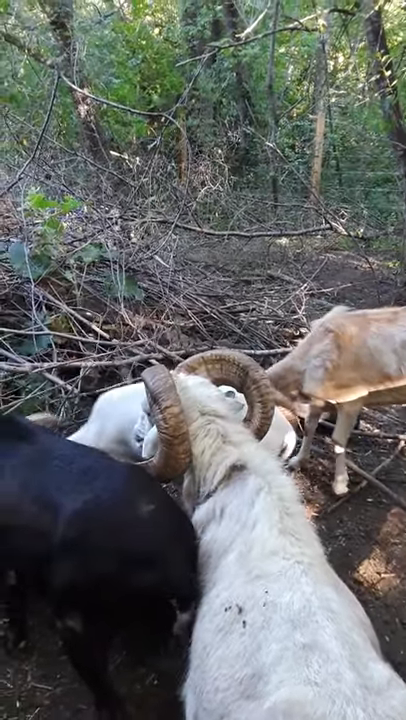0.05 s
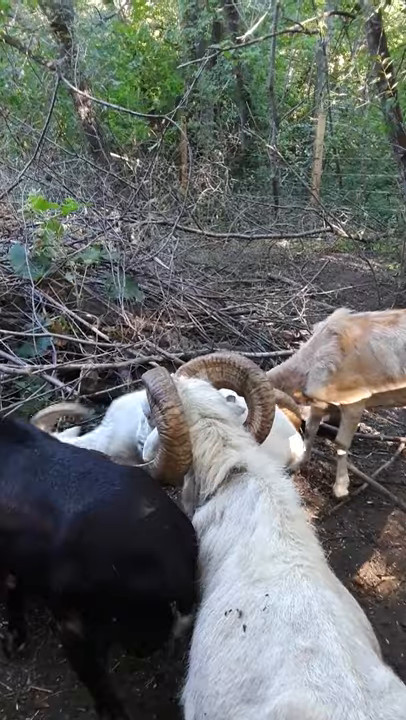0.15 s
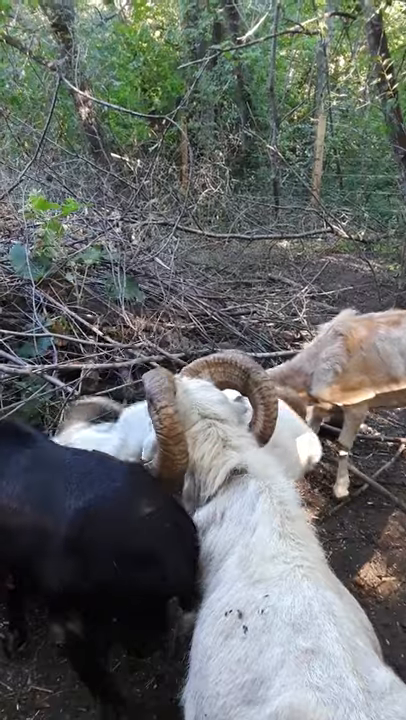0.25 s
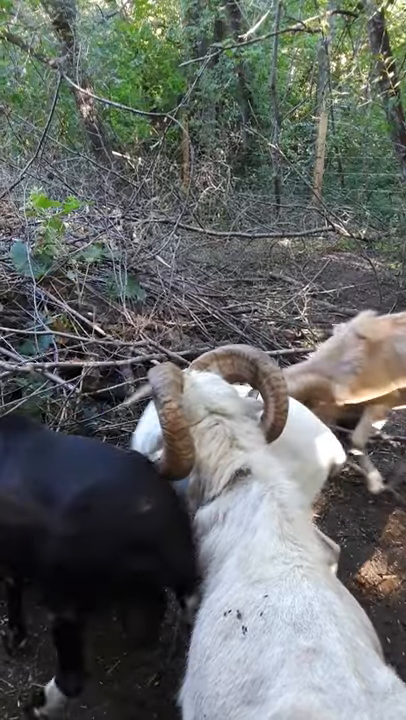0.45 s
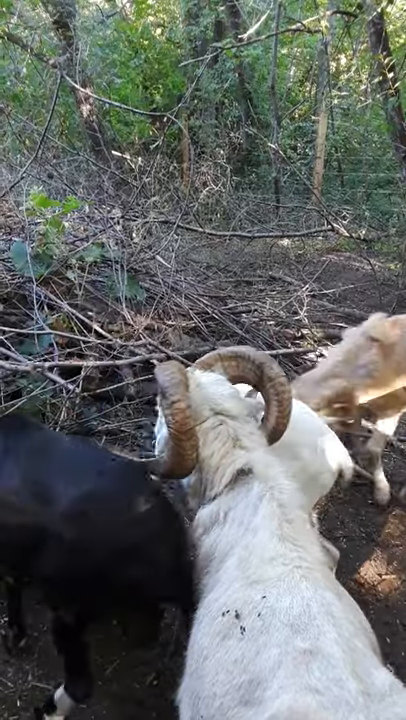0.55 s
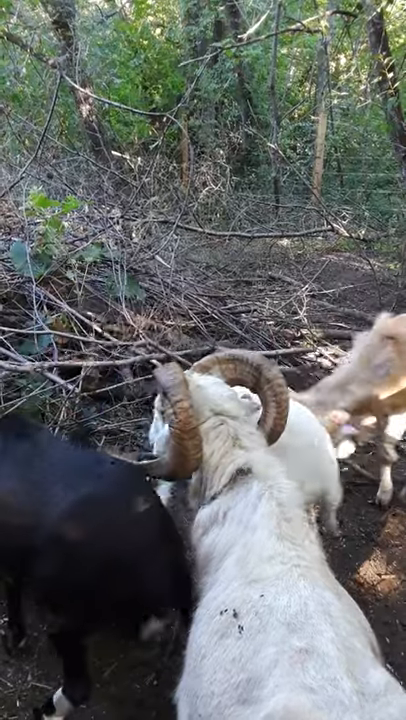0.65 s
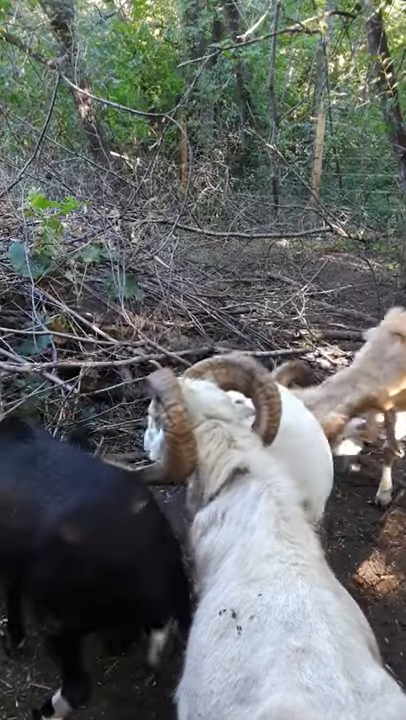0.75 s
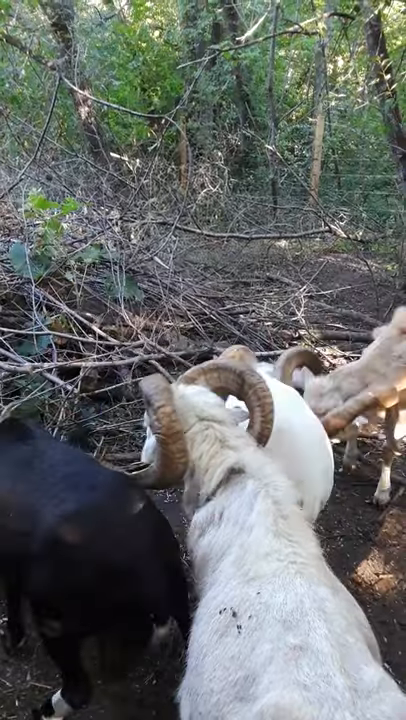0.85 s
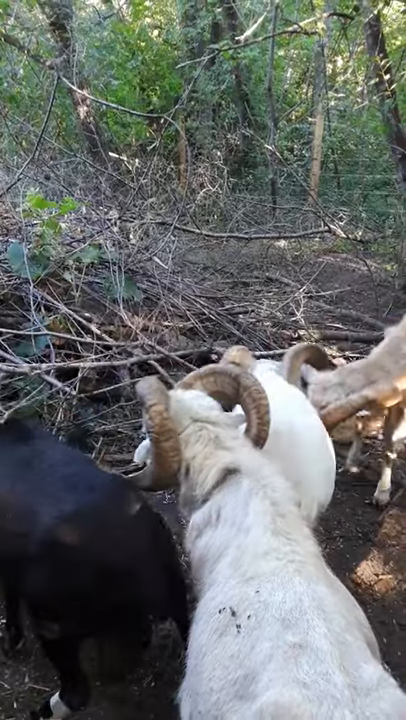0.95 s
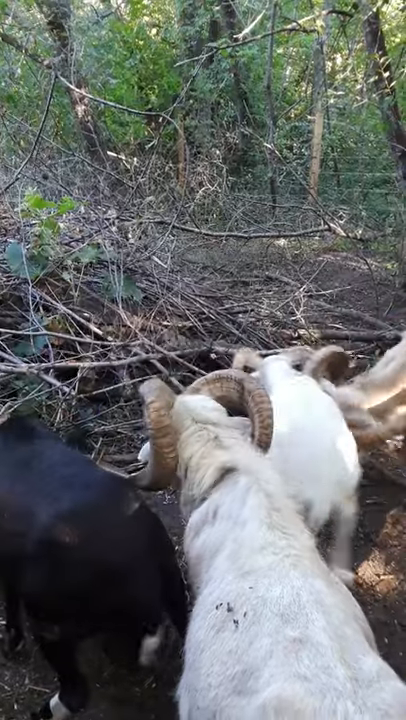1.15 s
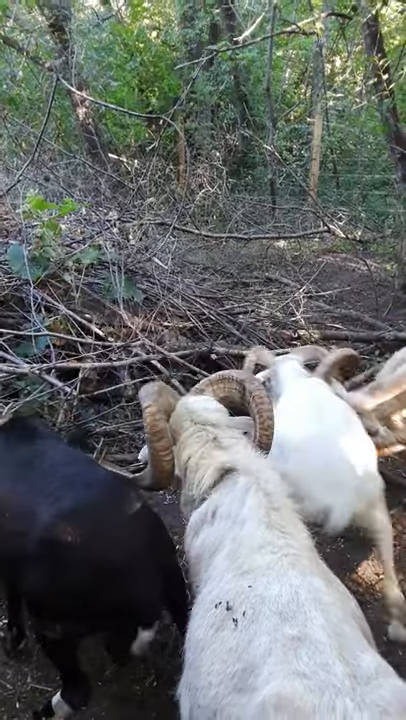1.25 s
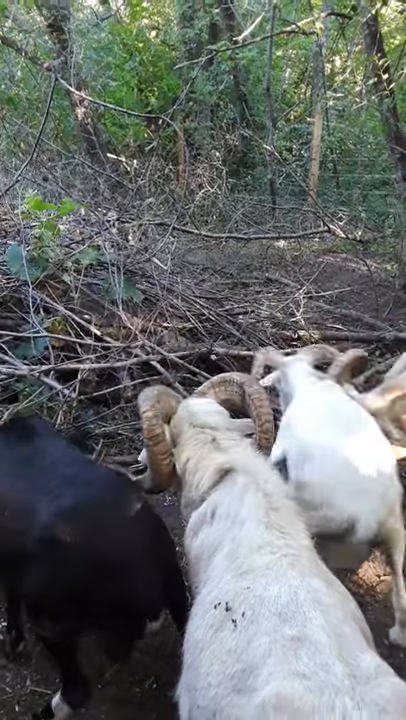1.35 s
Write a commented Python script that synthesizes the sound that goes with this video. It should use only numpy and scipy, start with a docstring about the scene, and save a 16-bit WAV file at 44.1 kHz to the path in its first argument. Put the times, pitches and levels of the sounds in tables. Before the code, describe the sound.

Horns knock close by as rams jostle in an earth pen. A few short, hollow knocks come between 0.2 and 0.5 seconds, joined by dull hoof thuds. At about 0.6 seconds the horns clash once, hard and sharp, with a faint tail from the trees. Hooves keep thudding and scuffing through dry litter until about 1.3 seconds, with a lighter knock near 1.1, over quiet outdoor air.

```python
"""Horns knock a few times, then clash once hard: rams jostle a step away in an earth pen by a wood.
Each knock is a rough contact force plus the short ring of horn; in the clash the skulls ring too.
Hooves thud on earth, scuff through dry litter and crackle straws.
Ground and animals scatter the blows quickly; the trees add a faint tail.
Under it all lies quiet outdoor air with distant hums."""
import sys
import numpy as np
from scipy import signal
from scipy.fft import rfft, irfft
from scipy.io import wavfile
from scipy.ndimage import uniform_filter1d

SR = 44100
rng = np.random.default_rng(int(sys.argv[2]) if len(sys.argv) > 2 else 0)


def file_out(sig):
    """Save sig as 16-bit WAV at sys.argv[1]."""
    # one column per channel
    cols = np.atleast_2d(sig).T
    # limit, then scale
    lim = np.clip(cols, -1, 1)
    pcm = np.round(lim * 32767).astype(np.int16)
    wavfile.write(sys.argv[1], SR, pcm)


N = 61739
BLOW_SAMPLES = 8192
T, HZ = np.arange(BLOW_SAMPLES) / SR, np.fft.rfftfreq(BLOW_SAMPLES, 1 / SR)

# Modes of horns and skulls together. Each row: frequency in Hz, level in dB, T60 in seconds.
CLASH_MODES = [(124.3, -34, 0.16), (176.3, -36, 0.19), (223.6, -25, 0.097), (274, -24, 0.092),
               (386.5, -19, 0.08), (475, -36.5, 0.091), (564, -10, 0.036), (650, -49, 0.012),
               (820, -23, 0.042), (1140, -29.5, 0.044), (1265, -56, 0.013), (1398, -18.5, 0.05),
               (1579, -12, 0.03), (1890, -23.5, 0.012), (2395, -17, 0.022), (2720, -20.5, 0.013)]
# Spectra of the first blow and the fizz after it. Each row: frequency in Hz, gain in dB.
CRACK_EQ = [(20, -34), (50, -28), (90, -11), (150, 6), (500, 13.5), (1400, 8), (2700, -0.5), (3400, -15.5),
            (5000, -20.5), (9000, -28), (16000, -34)]
FIZZ_EQ = [(200, -4), (700, -4), (1600, 8), (2700, 3), (3600, -2.5), (5500, -15), (9000, -16),
           (16000, -14.5)]

def clash(touch_s=0.00097, touch_db=3, push_delay_s=0.0012, rise_s=0.0019, fizz_decay_s=0.023):
    """A rough touch, the full push, the ring of horn and skull, and a fizz of ridges grinding past."""
    touch = amp(touch_db) * contact(touch_s)
    push = np.sinc((T - push_delay_s) * SR)
    crack = colour(touch + push, curve(CRACK_EQ, HZ))
    ringing = ring(CLASH_MODES) * (1 - np.exp(-T / rise_s))
    grind = unit_energy(noise(BLOW_SAMPLES) * np.exp(-T / fizz_decay_s))
    fizz = colour(grind, curve(FIZZ_EQ, HZ))
    return pan(-2) * (crack + ringing) + pan(-1) * fizz


# Horn knocks. Each row: start in seconds, contact in seconds, T60 factor,
# seven gains in dB at KNOCK_BANDS_HZ, pan in dB.
KNOCKS = [(0.2133, 0.0036, 0.85, 6, 11, 14.5, 10.5, -5, -29, -30.5, -2.5),
          (0.2607, 0.0014, 1.32, -6, 1, 17.5, 10.5, 3.5, -12, -31, -2),
          (0.3425, 0.0047, 0.63, 0, -39, 13.5, 10, 1, -20, -42, -2),
          (0.4797, 0.0016, 0.83, -14, 14.5, 9, 7.5, -5, -20.5, -34, -1),
          (1.1333, 0.00075, 0.42, 4, -21, -1, -5, -9, -15.5, -39, 0)]
KNOCK_BANDS_HZ = [100, 230, 550, 1100, 2500, 4000, 9000]
# Horn modes. Each row: frequency in Hz, level in dB, T60 in seconds.
HORN_MODES = [(231.6, -4, 0.065), (458, -1.5, 0.098), (532, -24.5, .1), (590, -1, 0.042),
              (681, -11.5, 0.19), (825, 1.5, 0.041), (960, -3, 0.051), (1083, -4.5, 0.087),
              (1188, 10, 0.023), (1615, -8.5, 0.067), (1953, 3, 0.032), (2300, -5, 0.03),
              (2567, 8.5, 0.032), (2956, 5, 0.026)]

def knock(contact_s, t60_factor, gains_db, pan_db, force_db=-2.5, horn_db=-11.5):
    """A rough blow and the short ring of the horn, coloured by where it lands."""
    onset = 1 - np.exp(-(T / contact_s) ** 2)
    horn = unit_energy(ring(HORN_MODES, t60_factor) * onset)
    blow = amp(force_db) * contact(contact_s) + amp(horn_db) * horn
    eq = [(30, gains_db[0] - 23), *zip(KNOCK_BANDS_HZ, gains_db)]
    return pan(pan_db) * colour(blow, curve(eq, HZ))


# Horn-tip ticks. Each row: start in seconds, level in dB, centre in Hz, sigma in octaves, pan in dB.
TIP_TICKS = [(.2165, -21, 5530, 0.21, -8), (0.2587, 4, 3860, 0.095, 5), (0.2585, 8.5, 2510, 0.26, -8),
             (0.2946, 7.5, 950, 0.33, 0), (.764, -11, 2400, 0.52, -2), (1.182, 1, 1080, 0.19, -1),
             (1.3155, -15, 1620, .6, -10)]

def tip_tick(level_db, centre_hz, sigma_octaves, pan_db, contact_s=0.001123):
    """A horn tip glances off: a brief contact heard in one band."""
    band_db = 20 * np.log10(hump(centre_hz, sigma_octaves) + 0.0096)
    return pan(pan_db) * colour(contact(contact_s), level_db + band_db)


# Hoof falls and body bumps. Each row: start in seconds, contact in seconds, thump in dB,
# centre in Hz, grit in dB.
THUDS = [(.414, 0.0035, 3, 604, -21), (0.4503, 0.00434, 1.5, 567, -4), (0.4868, 0.004, 11, 247, -14),
         (0.493, 0.0032, 4, 102, -8), (0.524, 0.012, 5, 396, -10), (.538, .004, 4, 205, -28),
         (.549, 0.0013, -3.5, 462, -25), (.567, 0.0013, 3.5, 424, -9), (0.622, .005, 6, 94, -28),
         (0.643, 0.0036, -1, 343, -7), (0.763, 0.0033, -8.5, 570, -6), (.868, 0.0057, 2, 213, -16),
         (0.9195, 0.0021, 6, 369, -2), (0.958, 0.0022, 0.5, 407, -9), (1.084, 0.0058, -9.5, 488, -7.5),
         (1.181, 0.008, -5, 432, -3.5), (1.201, 0.0028, -1, 357, -7.5), (1.27, 0.0032, 3, 227, -13),
         (1.285, 0.0047, 1, 217, -13), (1.315, 0.0024, -4.5, 224, -4.5)]
# Grit spectrum. Each row: frequency in Hz, gain in dB.
GRIT_EQ = [(100, -11), (500, -6), (1100, -5), (1700, -7), (2600, -22.5), (3600, -35), (8000, -41),
           (16000, -36)]

def thud(contact_s, thump_db, centre_hz, grit_db, t60_s=0.047):
    """A dull push into the earth, a very short hollow ring and a little grit on top."""
    thump = hump(centre_hz, 0.55) + amp(-11.5) * hump(centre_hz / 2, 0.73)
    gain = amp(thump_db - 4) * thump + amp(grit_db + curve(GRIT_EQ, HZ))
    push = colour(contact(contact_s), 20 * np.log10(gain))
    hollow = ring([(centre_hz, thump_db - 35.5, t60_s)]) * (1 - np.exp(-T / contact_s))
    return pan(-1.5) * (push + hollow)


# Scuffs. Each row: peak time in seconds, sigma in seconds, level in dB.
SCUFFS = [(0.276, 0.022, -46), (0.412, 0.022, -50), (.735, 0.014, -47), (0.777, 0.0089, -48),
          (1.096, 0.0091, -55.5), (1.136, 0.013, -45.5), (1.165, 0.028, -57.5), (1.239, 0.0052, -51.5)]
# Shuffling of the flock. Each row: time in seconds, trample level in dB, hiss level in dB.
SHUFFLE = [(0, -61, -73), (.19, -63, -68.5), (.29, -49, -65.5), (.38, -53.5, -64), (.54, -49, -63),
           (0.679, -60.5, -63), (0.788, -51, -62.5), (.85, -63.5, -66.5), (.97, -57, -68), (1.06, -61, -68),
           (1.15, -53.5, -67), (1.21, -55.5, -69.5), (1.3, -56.5, -65.5), (1.4, -58, -68.5)]
# Spectra of scuff, trample and hiss. Each row: frequency in Hz, gain in dB.
SCUFF_EQ = [(100, -1.5), (500, 7.5), (1400, 3.5), (2600, 3.5), (3500, -9.5), (5000, -7.5), (9000, -22.5),
            (16000, -20)]
TRAMPLE_EQ = [(30, -38), (100, -1), (250, 2.5), (600, -1.5), (1100, -2), (2400, -8), (3300, -21),
              (4400, -17), (7000, -22.5), (16000, -56)]
HISS_EQ = [(30, -9), (2000, -2), (3400, -15), (4500, -1.5), (8000, 5.5), (12500, 8), (16000, 0)]

def litter(grain_db=2):
    """Hooves move through dry litter: grainy scuffs, low trampling and a fine hiss."""
    t = np.arange(N) / SR
    times_s, trample_db, hiss_db = np.transpose(SHUFFLE)
    flutters = [unit_rms(uniform_filter1d(rng.standard_normal(N), size)) for size in (90, 400)]
    scuff_grain, trample_grain = [unit_rms(amp(grain_db * flutter)) for flutter in flutters]
    scuff_power = sum((amp(db) * bell(t - peak_s, sigma_s)) ** 2 for peak_s, sigma_s, db in SCUFFS)
    scuffs = np.sqrt(scuff_power) * scuff_grain * noise(N, lambda hz: curve(SCUFF_EQ, hz))
    trample_gain = amp(np.interp(t, times_s, trample_db)) * trample_grain
    trample = trample_gain * noise(N, lambda hz: curve(TRAMPLE_EQ, hz))
    hiss = amp(np.interp(t, times_s, hiss_db)) * noise(N, lambda hz: curve(HISS_EQ, hz))
    return pan(-4) * (scuffs + trample) + hiss


# Straw crackles. Each row: peak time in seconds, sigma in seconds, level in dB.
STRAWS = [(.733, .004, -60), (1.085, .003, -61), (1.105, .003, -54), (1.125, 0.0069, -57)]

def straws(highpass_hz=5000):
    """Dry straws crackle under a hoof in brief bright bursts."""
    t = np.arange(N) / SR
    envelope = sum(amp(db) * bell(t - peak_s, sigma_s) for peak_s, sigma_s, db in STRAWS)
    return envelope * noise(N, lambda hz: -10 * np.log10(1 + (highpass_hz / (hz + 1)) ** 4))


def near_scatter(blows, gain_db=-15, peak_s=0.008, highpass_hz=565):
    """Quick reflections off the ground and the other animals, different in each ear."""
    taps = unit_energy(rng.standard_normal((2, BLOW_SAMPLES)) * T * np.exp(-T / peak_s))
    taps = signal.sosfilt(signal.butter(2, highpass_hz, "high", fs=SR, output="sos"), taps)
    return amp(gain_db) * signal.fftconvolve(blows, taps, axes=1)[:, :N]


# Reverberation of the wood. Each row: frequency in Hz, level in dB, T60 in seconds.
TREE_TAIL = [(59.7, -7, 0.15), (252, -12.5, 0.3), (587, -20.5, 0.36), (1510, -16.5, 0.27),
             (2970, -17, 0.61), (5870, -6, 0.49), (16000, -19, .4)]

def tree_scatter(blows, rise_s=0.0061):
    """Trunks and brush scatter a faint tail, each band dying at its own rate."""
    hz, t, bands = signal.stft(noise(SR // 2), SR, nperseg=256)
    table = np.array(TREE_TAIL)
    level_db = curve(table[:, [0, 1]], hz)[:, None]
    t60_s = curve(table[:, [0, 2]], hz)[:, None]
    energy_norm = np.sqrt(2 * np.log(1000) / (t60_s * SR))
    tail = signal.istft(bands * amp(level_db - 60 * t / t60_s) * energy_norm, SR, nperseg=256)[1]
    tail *= 1 - np.exp(-(np.arange(tail.shape[1]) / SR / rise_s) ** 2)
    return signal.fftconvolve(blows, tail, axes=1)[:, :N]


# Spectrum of still air. Each row: frequency in Hz, gain in dB.
AIR_EQ = [(20, -31), (45, -22), (72, 5), (118, 1.5), (160, -20), (350, -17.5), (600, -2), (950, -10.5),
          (2000, -20.5), (3200, -37), (5000, -48), (16000, -38)]
# Far hums and a thin high whirr. Each row: centre in Hz, width in Hz, level in dB,
# peak time in seconds, sigma in seconds.
HUMS = [(125.7, 6.9, -63.5, 0.52, 0.85), (686, 43, -58.5, 0.028, 0.18), (681, 62, -63, .87, 0.08),
        (683, 21, -57, 0.85, 0.23), (341, 10.6, -63, 0.055, 0.038), (5770, 470, -66, 0.017, 0.068),
        (5750, 250, -68.5, 0.33, 0.058), (3390, 120, -72.5, .17, 0.022), (4280, 890, -67, 1.3, 0.065)]

def air(level_db=-61):
    """Quiet outdoor background with narrow hums that come and go."""
    t = np.arange(N) / SR
    bed = amp(level_db) * noise(N, lambda hz: curve(AIR_EQ, hz))
    for centre_hz, width_hz, db, peak_s, sigma_s in HUMS:
        hum = noise(N, lambda hz: -20 * np.log10(1 + (2 * (hz - centre_hz) / width_hz) ** 2))
        bed += amp(db) * bell(t - peak_s, sigma_s) * hum
    return bed


# Likeness of the two ears. Each row: frequency in Hz, correlation from 0 to 1.
EAR_CORRELATION = [(30, 1), (400, 0.92), (1000, 0.19), (2000, 0.0037), (3500, 0.1), (6000, 0),
                   (16000, 0.046)]

def noise(samples, spectrum_db=lambda hz: 0 * hz):
    """Shaped stereo noise at rms 1, alike in both ears in the bass."""
    hz = np.fft.rfftfreq(samples, 1 / SR)
    mid, side = rfft(rng.standard_normal((2, samples)))
    correlation = curve(EAR_CORRELATION, hz)
    mid, side = np.sqrt(1 + correlation) * mid, np.sqrt(1 - correlation) * side
    return unit_rms(irfft(np.array([mid + side, mid - side]) * amp(spectrum_db(hz)), samples))


def contact(peak_s):
    """The rough force of a blow: a brief swell of tiny slips with an even spectrum and energy 1."""
    swell = T / peak_s * np.exp(1 - T / peak_s)
    force = noise(BLOW_SAMPLES) * swell
    for _ in range(3):  # whiten, then confine in time again
        spectrum = rfft(force)
        force = irfft(spectrum / (abs(spectrum) + 1e-9)) * swell ** 0.25
    return unit_energy(force)


def ring(modes, t60_factor=1, lead_at_1khz_rad=0.14):
    """Dying sines, neighbours in opposite sign; some reach the left ear first, some the right."""
    ringing = np.zeros((2, BLOW_SAMPLES))
    for k, (hz, db, t60_s) in enumerate(modes):
        lead_rad = lead_at_1khz_rad * np.sqrt(hz / 1000) * (-1) ** (k // 2) * np.array([[1], [-1]])
        envelope = amp(db - 60 * T / (t60_s * t60_factor))
        ringing += (-1) ** k * envelope * np.sin(2 * np.pi * hz * T + lead_rad)
    return ringing


def colour(x, gain_db):
    """Minimum-phase filter with gain_db at the frequencies HZ."""
    cepstrum = irfft(np.log(amp(gain_db) + 1e-6))
    cepstrum[1:BLOW_SAMPLES // 2] *= 2
    cepstrum[BLOW_SAMPLES // 2 + 1:] = 0
    impulse = irfft(np.exp(rfft(cepstrum)))
    return signal.fftconvolve(x, impulse[None], axes=1)[:, :BLOW_SAMPLES]


def curve(points, hz):
    """Interpolates a table on a log-frequency axis."""
    points_hz, values = np.transpose(points)
    return np.interp(np.log(hz + 1), np.log(points_hz + 1), values)


def bell(offset, sigma):
    """Gaussian with peak 1."""
    return np.exp(-0.5 * (offset / sigma) ** 2)


def hump(centre_hz, sigma_octaves):
    """Bell-shaped gain around a frequency."""
    return bell(np.log2((HZ + 1) / centre_hz), sigma_octaves)


def amp(db):
    """Decibels to gain."""
    return 10 ** (np.asarray(db) / 20)


def unit_rms(x):
    """Scales to rms 1."""
    return x / np.sqrt(np.mean(x ** 2) + 1e-20)


def unit_energy(x):
    """Scales to a mean energy of 1 per channel."""
    return unit_rms(x) / np.sqrt(x.shape[-1])


def pan(db):
    """Stereo gains, left louder than right by db."""
    return amp([[db / 2], [-db / 2]])


def add(mix, start_s, sound):
    """Lays a sound into the mix."""
    part = mix[:, round(start_s * SR):][:, :sound.shape[-1]]
    part += sound[..., :part.shape[1]]


def scene():
    """All blows and their scatter over litter, air and straws."""
    blows = np.zeros((2, N))
    add(blows, start_s=0.6023, sound=clash())
    for start_s, contact_s, t60_factor, *gains_db, pan_db in KNOCKS:
        add(blows, start_s, knock(contact_s, t60_factor, gains_db, pan_db))
    for start_s, *row in TIP_TICKS:
        add(blows, start_s, tip_tick(*row))
    for start_s, *row in THUDS:
        add(blows, start_s, thud(*row))
    return blows + near_scatter(blows) + tree_scatter(blows) + litter() + air() + straws()


def record(dry, cutoff_hz=15830):
    """A steep low-pass removes the highest treble."""
    lowpass = signal.firwin(511, cutoff_hz, window=("kaiser", 9), fs=SR)
    return signal.oaconvolve(dry, lowpass[None], "same")


dry = scene()
out = record(dry)
file_out(out)
```